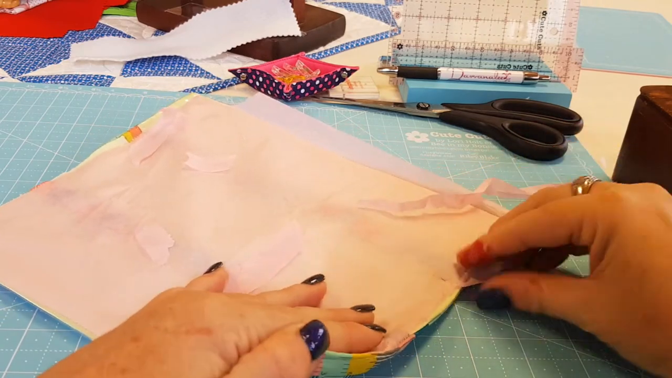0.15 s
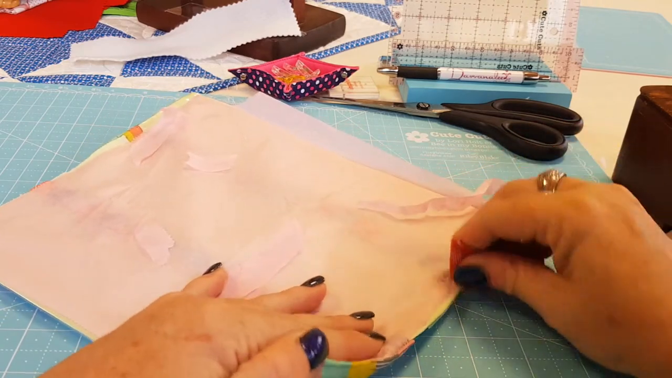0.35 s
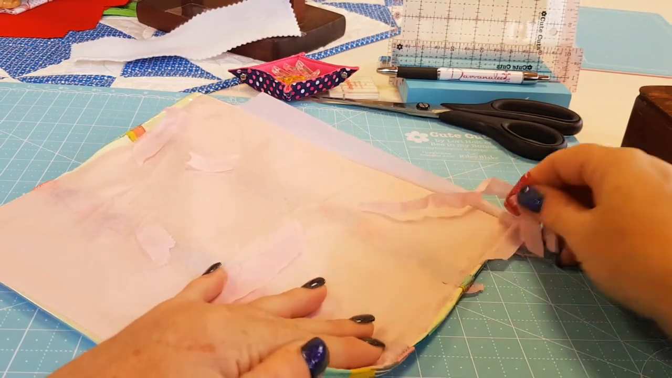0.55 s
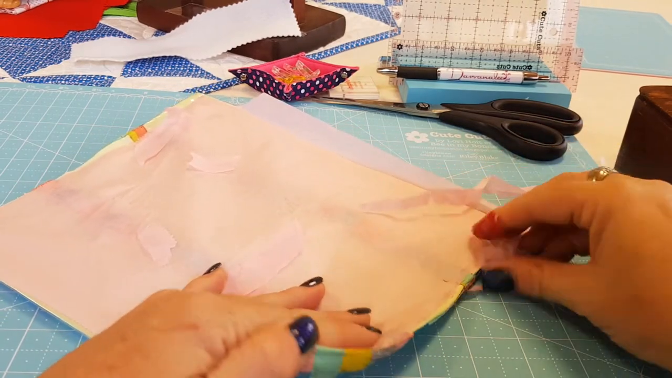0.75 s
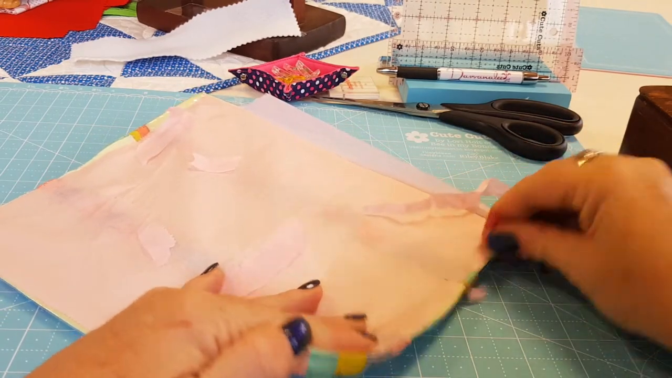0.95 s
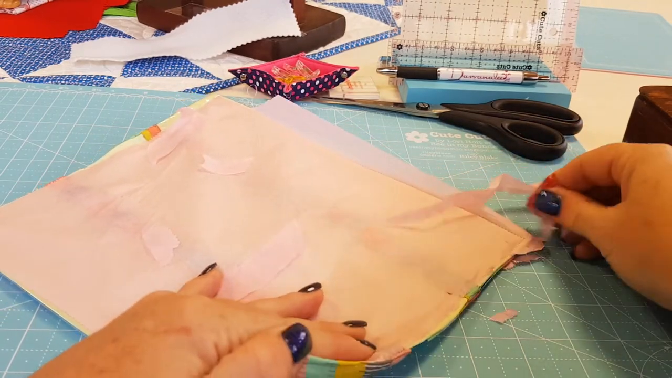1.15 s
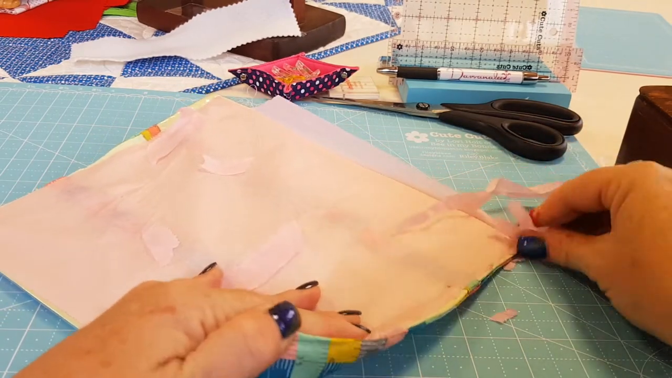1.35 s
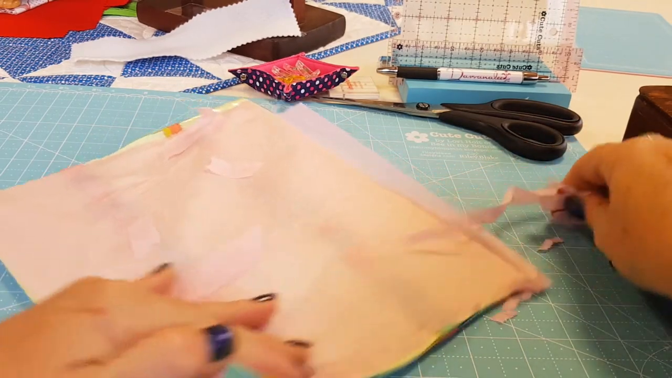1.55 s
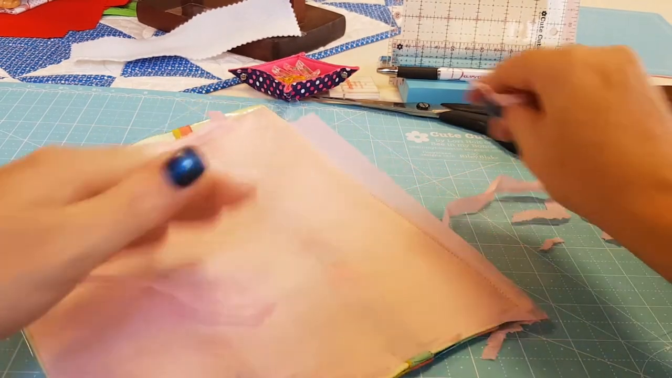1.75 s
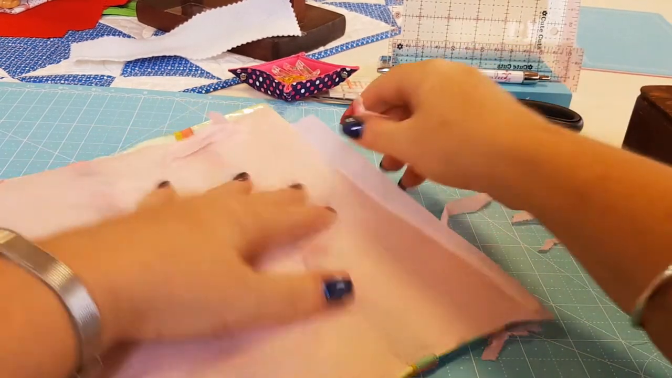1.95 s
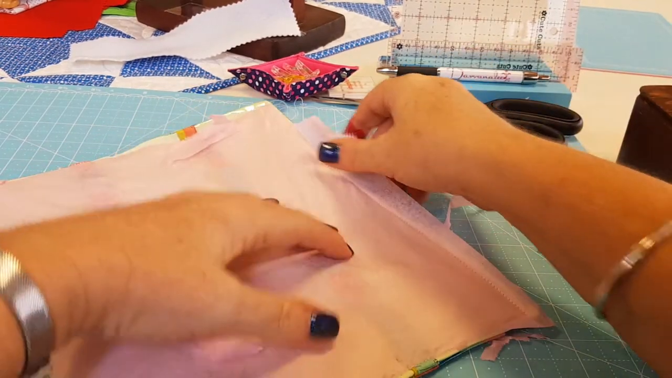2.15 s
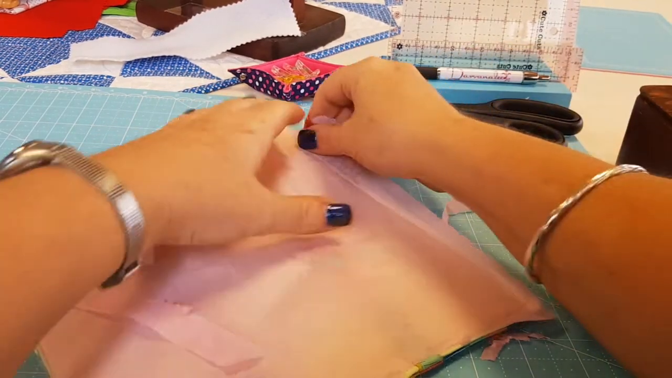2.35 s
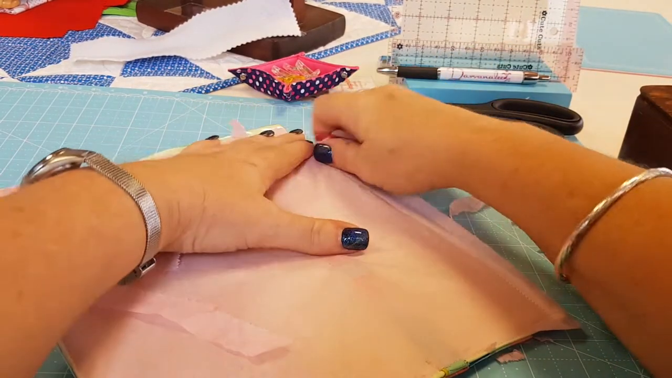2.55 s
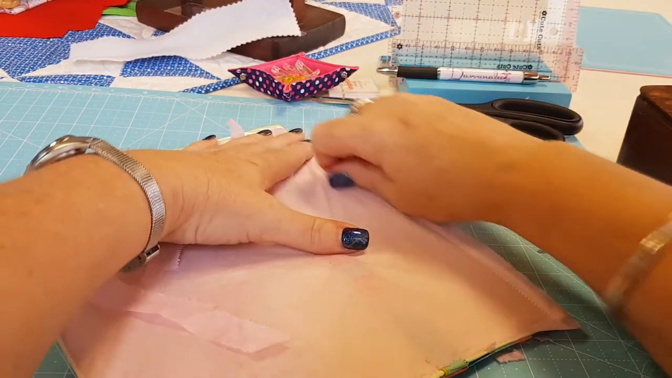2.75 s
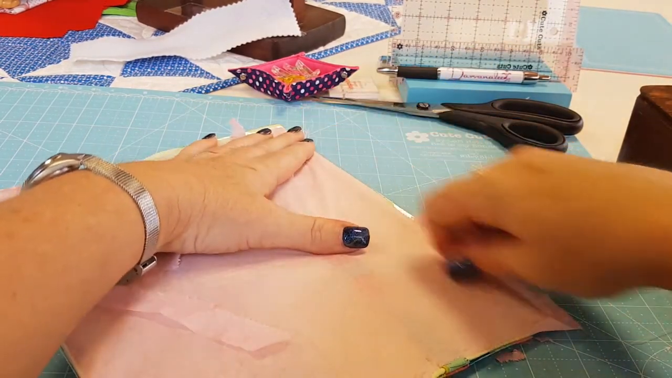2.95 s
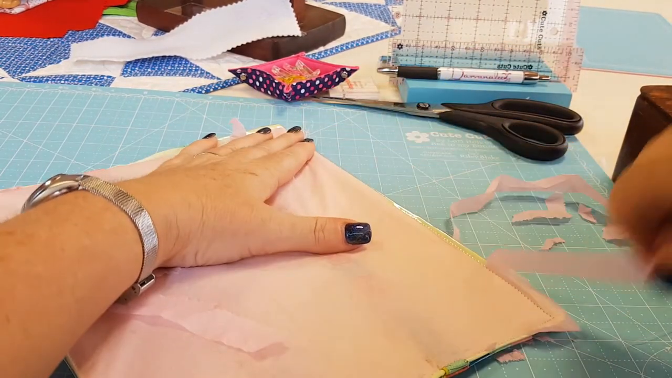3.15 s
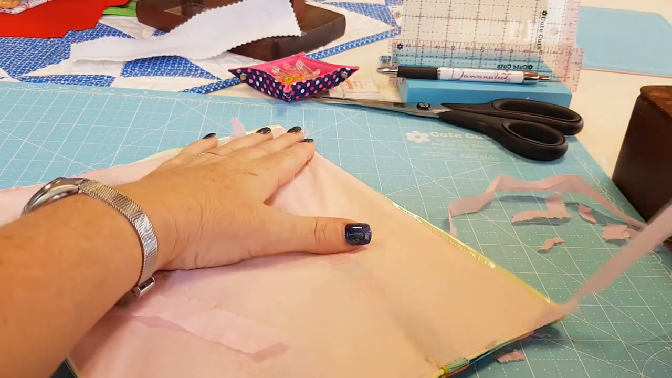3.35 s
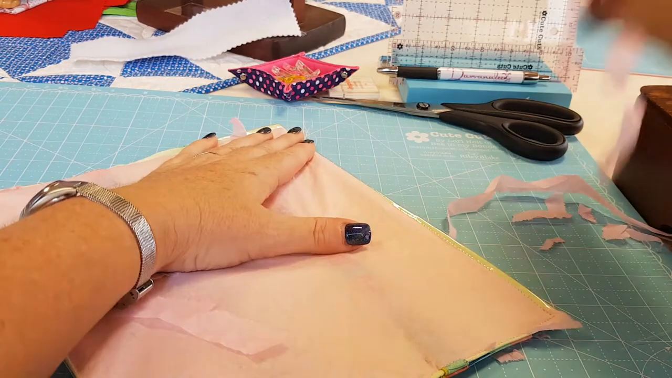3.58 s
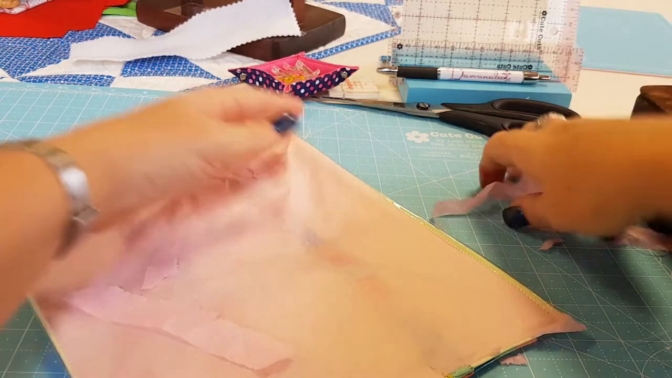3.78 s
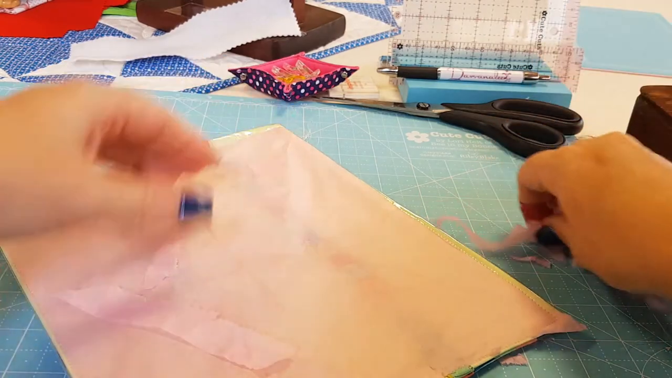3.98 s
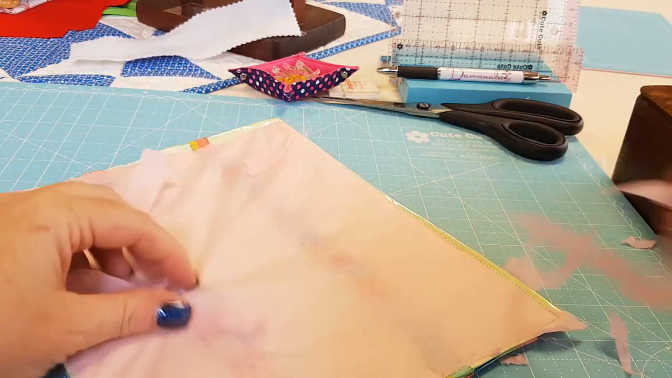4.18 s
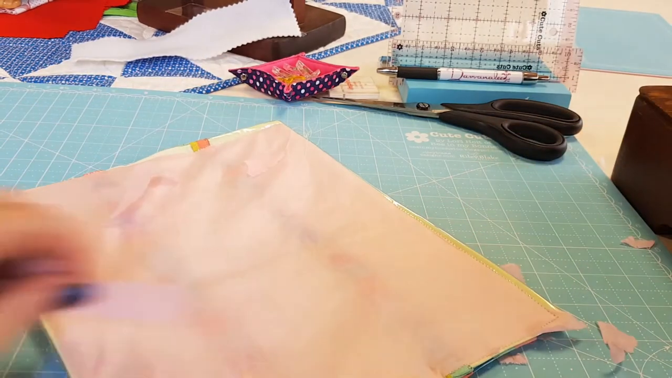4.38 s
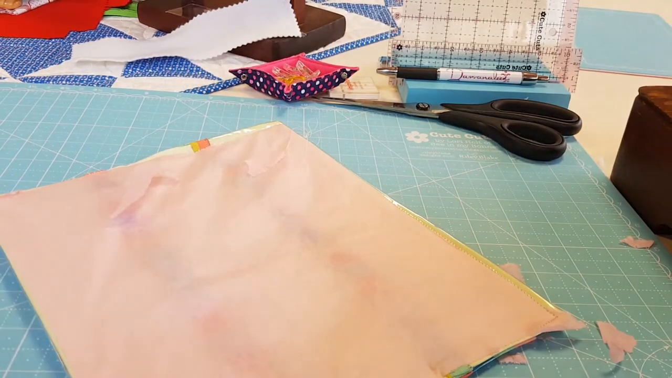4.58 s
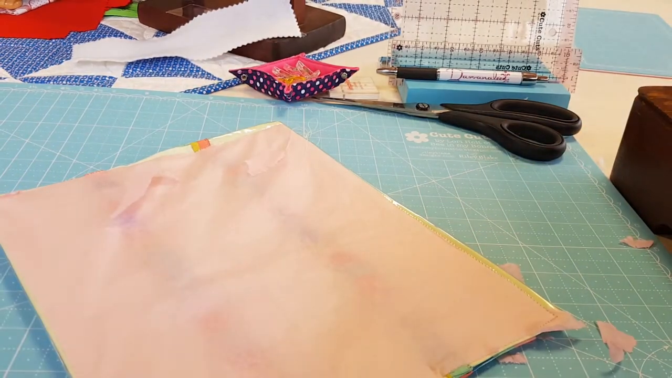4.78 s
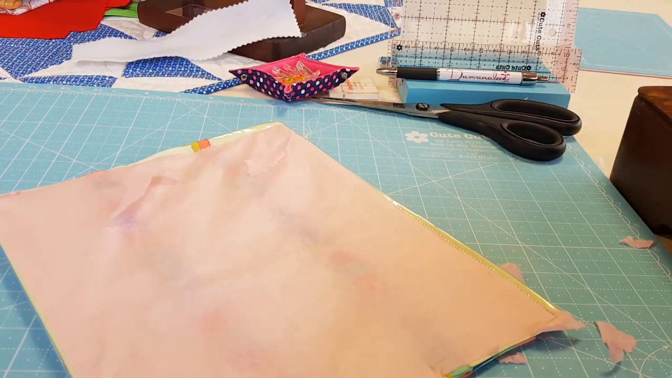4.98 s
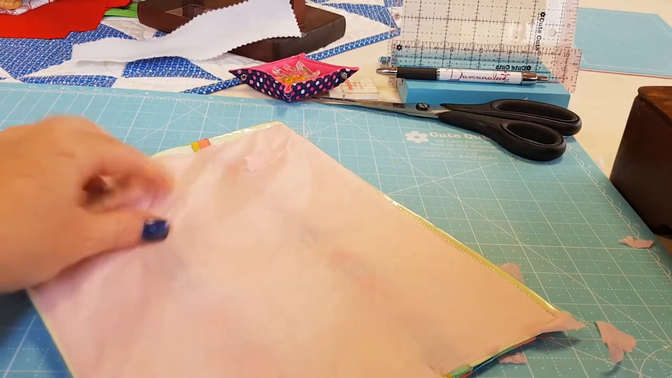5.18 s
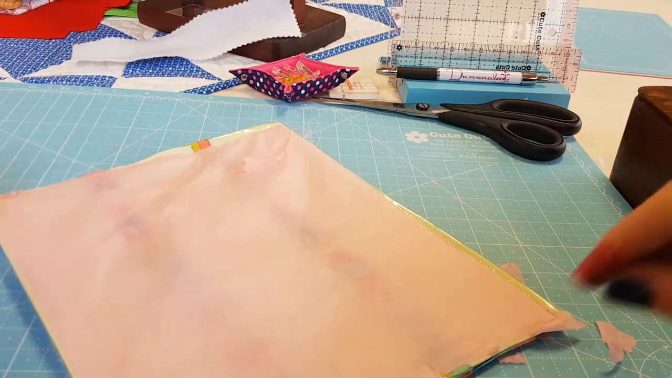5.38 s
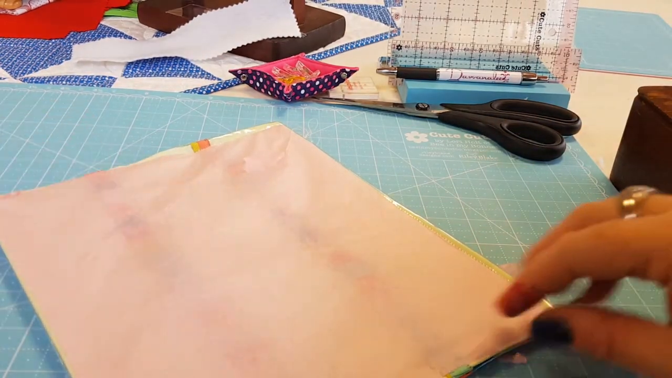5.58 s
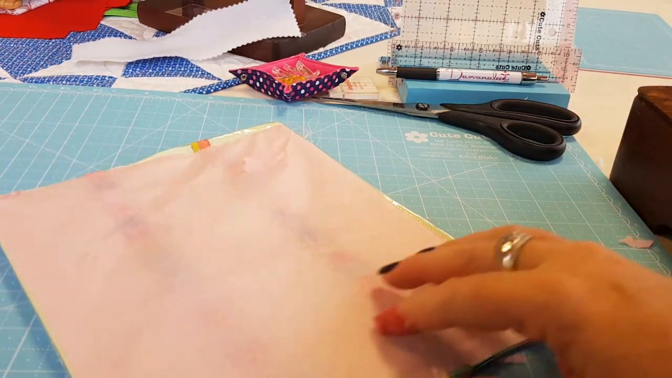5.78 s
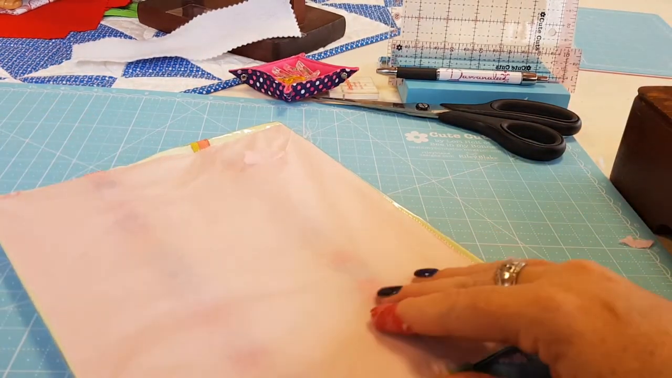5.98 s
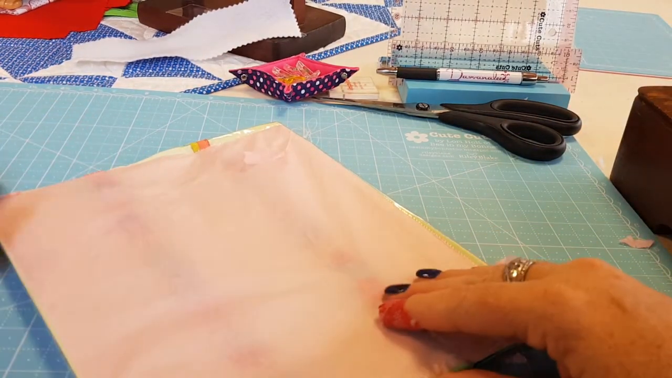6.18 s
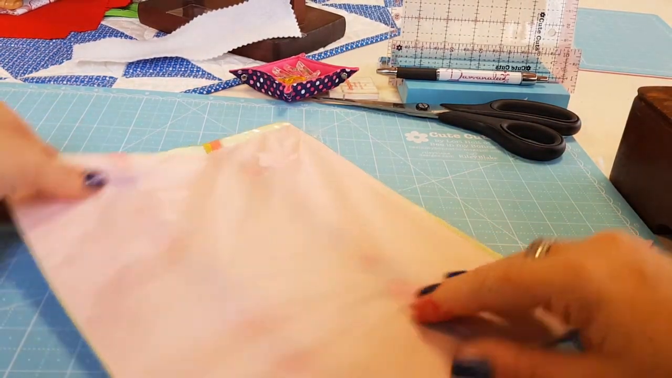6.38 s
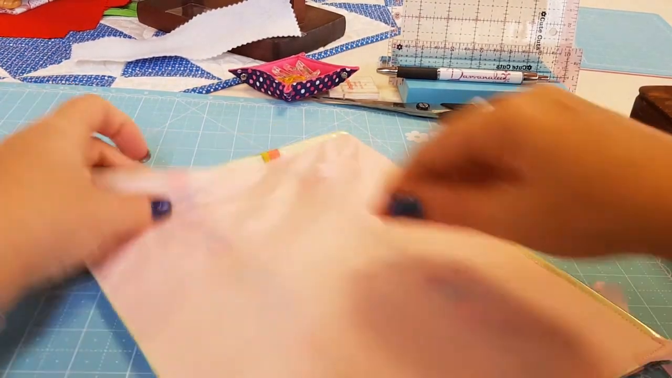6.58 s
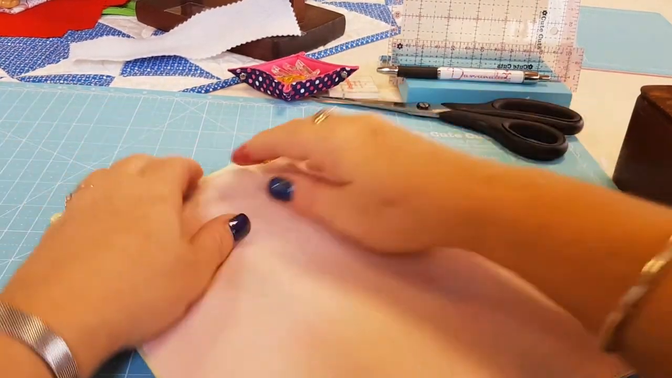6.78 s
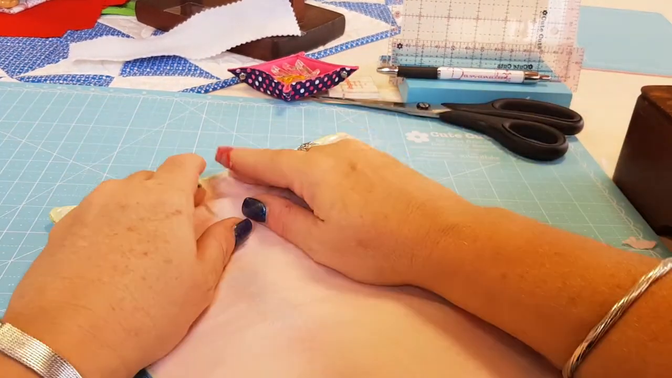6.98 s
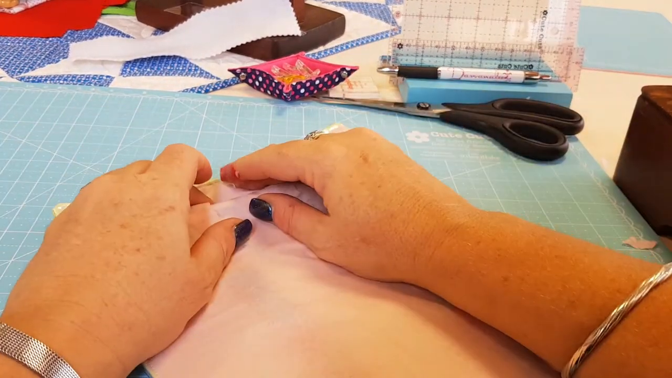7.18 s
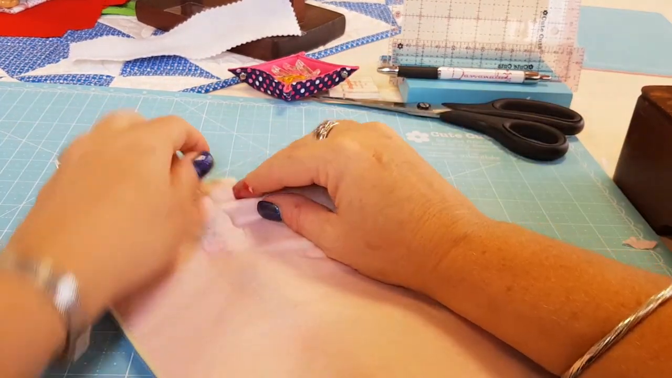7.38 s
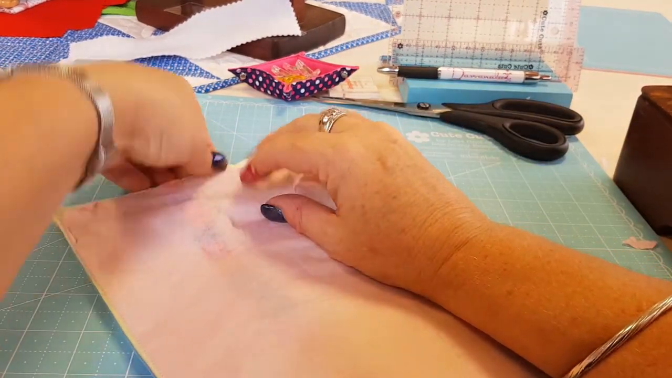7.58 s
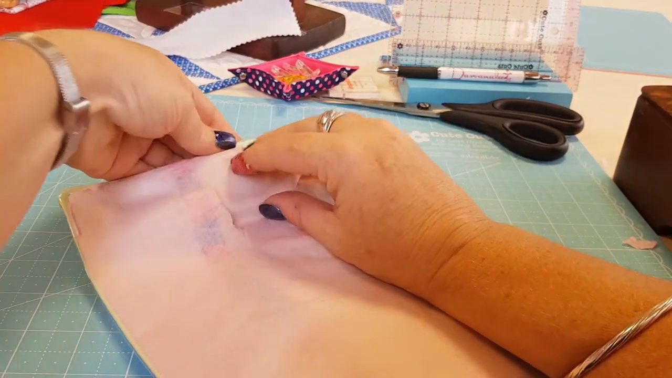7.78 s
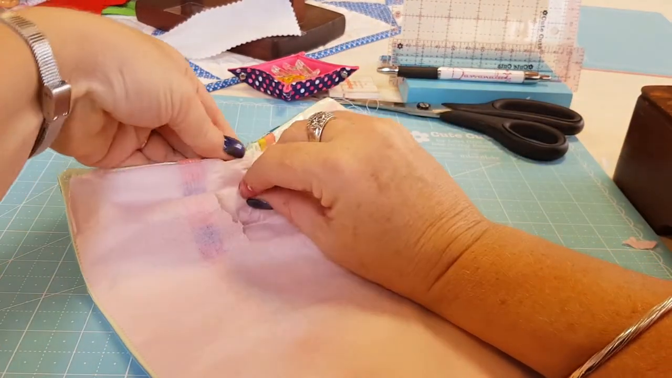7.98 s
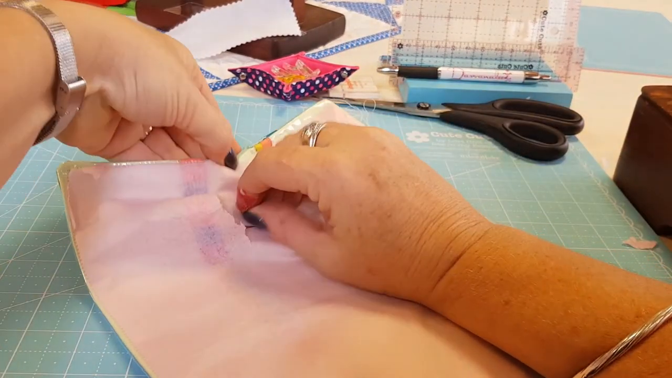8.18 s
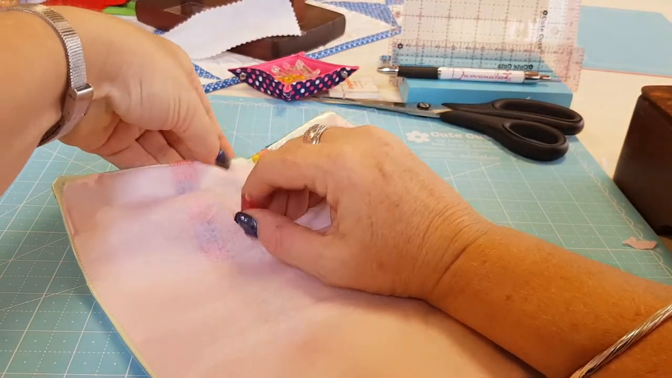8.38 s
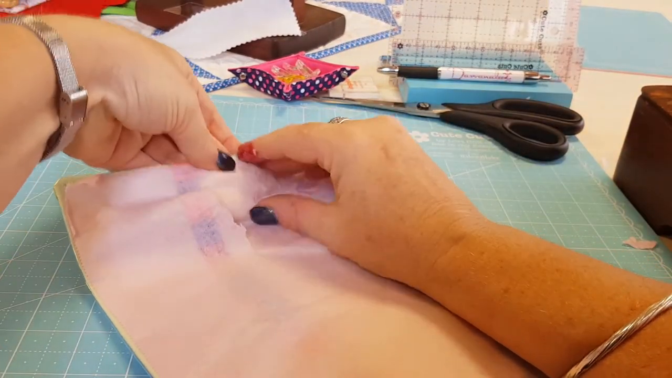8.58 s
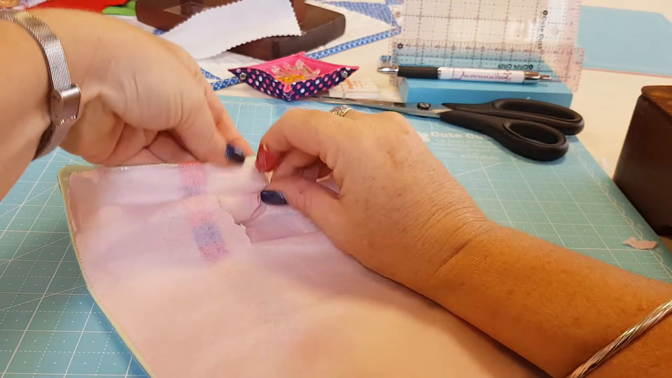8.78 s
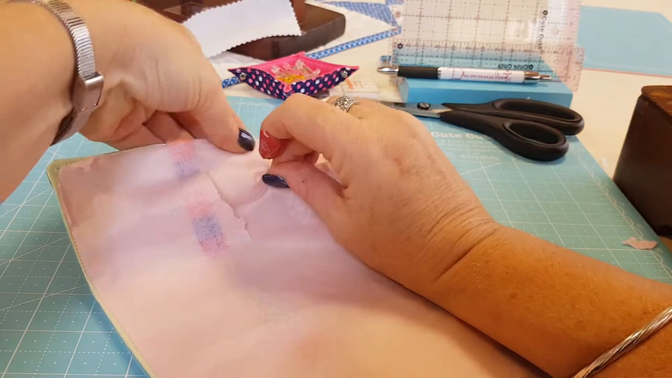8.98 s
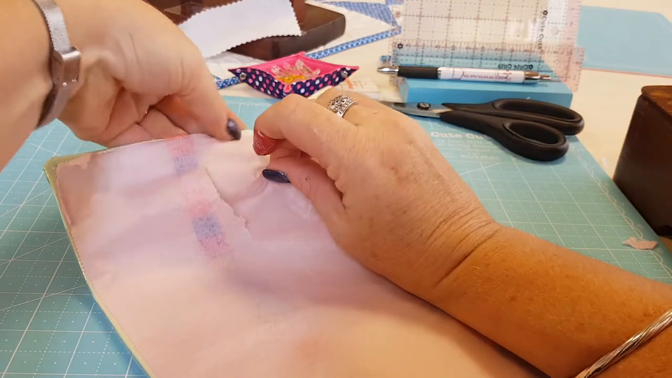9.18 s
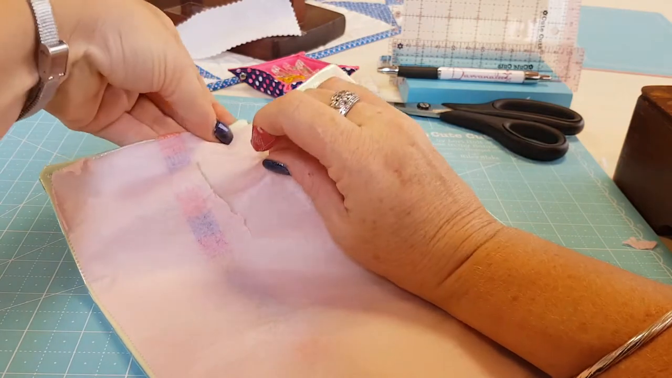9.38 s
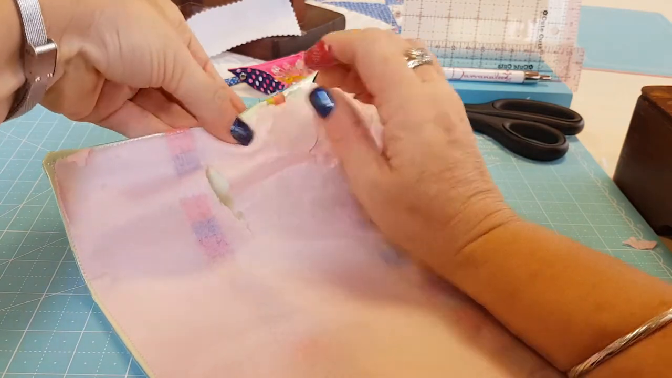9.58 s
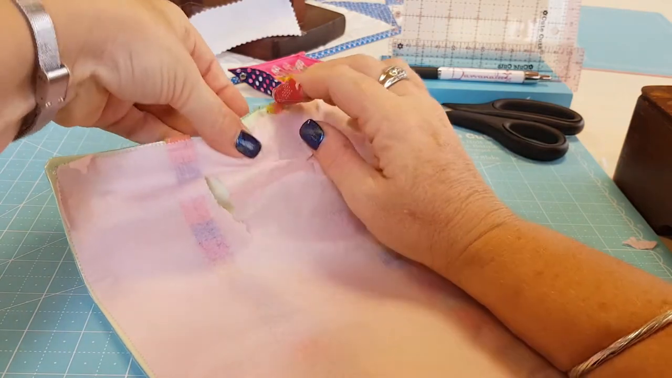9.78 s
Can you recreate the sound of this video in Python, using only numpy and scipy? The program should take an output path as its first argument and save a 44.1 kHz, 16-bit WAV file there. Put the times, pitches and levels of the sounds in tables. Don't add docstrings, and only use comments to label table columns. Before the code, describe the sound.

Thin paper is torn off stitched cloth in short dry rips and snaps, with crinkling, soft flops and knocks on a craft table.

```python
import sys
import numpy as np
from scipy import signal
from scipy.fft import rfft, irfft, next_fast_len
from scipy.io import wavfile
from scipy.ndimage import uniform_filter1d, map_coordinates

SR = 44100
rng = np.random.default_rng(int(sys.argv[2]) if len(sys.argv) > 2 else 0)


def rack_gain(trim_db):
    fader = np.asarray(trim_db, float)
    return 10 ** (fader / 20)


def output_pcm(signal):
    pcm = np.clip(np.atleast_2d(signal).T, -1, 1) * 32767
    wavfile.write(sys.argv[1], SR, np.round(pcm).astype(np.int16))


N = 433944


def unit(x):
    return x / np.sqrt(np.mean(x ** 2) + 1e-20)


def along(points, hz):
    f, v = np.transpose(points)
    return np.interp(np.log(hz + 1), np.log(f + 1), v)


def wobble(rate_hz):
    knots = rng.standard_normal(int(N * rate_hz / SR) + 4)
    return map_coordinates(knots, [np.arange(N) * rate_hz / SR])


def filtered(x, response):
    m = next_fast_len(N + SR // 2)
    return irfft(rfft(x, m) * response(np.fft.rfftfreq(m, 1 / SR)), m)[..., :N]


def above(hz, edge_hz):
    return 1 / (1 + (edge_hz / (hz + 1)) ** 8)


def pair(spectrum, alike):
    def mid_side(hz):
        turn = np.arccos(np.clip(along(alike, hz), -1, 1)) / 2
        return rack_gain(along(spectrum, hz)) * [np.cos(turn), np.sin(turn)]

    mid, side = filtered(rng.standard_normal((2, N)), mid_side)
    return unit(np.array([mid + side, mid - side]))


def grains(s, gain, hz, cycles, lag, pan_db, size):
    out, k = np.zeros((2, N + 2 * size)), np.arange(size)
    for side, sign in enumerate((.5, -.5)):
        start = np.clip(s * SR + sign * lag, 0, N)
        turns = (k + 1 - (start % 1)[:, None]) * hz[:, None] / SR
        level = (gain * rack_gain(sign * pan_db))[:, None]
        wave = level * np.sin(2 * np.pi * turns) * np.exp(-turns / cycles[:, None])
        at = start.astype(int)[:, None] + 1 + k
        out[side] = np.bincount(at.ravel(), wave.ravel(), N + 2 * size)
    return out[:, :N]


def swells(rows, rise_db_s, fall_db_s):
    t = np.arange(0, N / SR + .002, .001)
    s, hold_s = np.array(rows)[:, :2, None].transpose(1, 0, 2)
    early_s, late_s = np.clip(s - t, 0, 1), np.clip(t - s - hold_s, 0, 1)
    return rack_gain(-2 * rise_db_s * early_s - 2 * fall_db_s * late_s)


def fine(x):
    return np.interp(np.arange(N) / SR * 1000, np.arange(len(x)), x)


# t/s, left lag/samples, left-right/dB
HANDS = [(0, 1.5, -2), (1.4, 5.5, 3), (1.9, -1.5, 0.66), (2.6, -1, 1), (3.3, 7, 2), (3.9, 3, 1),
         (4.2, -8, 4), (5.2, -7.5, 5.5), (5.7, -13.5, 0.5), (6.3, -7, 8), (6.8, -3.5, -1), (9.84, -3.5, 8)]


def hands():
    s, *columns = np.transpose(HANDS)
    return [np.interp(np.arange(N) / SR, s, column) for column in columns]


# t/s, hold/s, level/dB, dullness/dB
RIPS = [(0.329, 0.0082, -50, 0.5), (0.377, 0.0462, -43, -2.5), (0.446, .078, -41, -3),
        (0.79, .06, -52.5, 4), (0.951, 0.0312, -46, -1.5), (0.994, 0.03965, -42, -2),
        (1.935, .04, -45, 6.5), (2.438, .04, -44, 4), (2.581, .09, -46.5, 6), (2.702, 0.052, -47, 3.5),
        (3.152, 0.053, -46, 1.5), (3.249, 0.064, -41.5, -0.5), (3.328, 0.033, -40.5, -2.5),
        (4.077, 0.0407, -46.5, 0), (4.155, .1, -49, 1), (4.293, 0.033, -51, 2), (5.158, 0.07, -47, 1.5),
        (5.241, 0.0122, -49, -6), (5.509, 0.01958, -47, 6.5), (5.582, 0.027, -52.5, 11),
        (7.786, .035, -47.5, 4), (7.86, .03, -43.5, 2), (8.159, 0.0277, -47, 3)]
# t/s, hold/s, level/dB, dullness/dB
CRINKLES = [(0.0, 0.00796, -49, 1), (0.234, 0.0207, -56, -1), (0.623, 0.01443, -52.5, 6.5),
            (0.77, 0.021, -58, 10), (0.905, 0.037, -54.5, 0.5), (7.76, 0.018, -56, 0),
            (2.541, 0.0203, -54, 5), (1.347, 0.0192, -54, 0.5), (3.728, 0.0151, -48.5, 5.5),
            (3.879, 0.0242, -46.5, 1), (4.608, 0.012, -61.5, -7.5), (5.876, 0.0202, -56, 1),
            (6.463, 0.023, -49, -2.5), (6.825, 0.0161, -50, 8), (7.136, 0.021, -53, 6.5),
            (7.274, 0.0098, -53, 5), (7.387, 0.0169, -48, 3), (7.62, 0.01293, -50, -3.5),
            (6.578, 0.014, -45.5, 1), (7.926, 0.0145, -51, -4), (8.023, 0.0186, -53.5, 0),
            (8.39, 0.02151, -50.5, 5.5), (8.476, 0.0283, -45, 0.5), (8.923, 0.022, -50.5, 7.5),
            (9.098, .028, -55, 1), (9.467, 0.0164, -53, 3.5), (9.702, .02, -56.5, 5)]
# t/s, hold/s, level/dB, dullness/dB
RUBS = [(1.424, .08, -60, -1.5), (2.0, .12, -51.5, -0.5), (2.802, 0.0665, -43.5, -4.5),
        (2.915, .13, -39, 0.5), (3.603, 0.1, -58.5, -2), (3.802, 0.0686, -53.5, 18), (4.24, .1, -55, 1),
        (5.26, .05, -56, 2), (5.55, .07, -60, 4), (4.513, 0.03, -68, -10), (4.906, 0.13, -77, 11),
        (5.771, 0.076, -66.5, 8), (5.96, 0.098, -70, 3), (6.261, .17, -55, 5.5), (6.681, 0.098, -56, 2),
        (6.863, 0.1261, -55, 5), (7.068, 0.0314, -54, 8.5), (7.177, .18, -54, 2.5),
        (8.055, 0.083, -53.5, 6), (8.186, 0.0835, -51.5, 7), (8.528, .18, -48.5, 3.5),
        (8.786, 0.1085, -54, 7), ]
# t/s, level/dB
SHIFTING = [(0, -62), (0.7, -66), (1.2, -67.5), (1.451, -58), (1.721, -61), (1.8, -99.5), (1.999, -59),
            (2.4, -63), (3.351, -54), (3.45, -81), (3.7, -62), (4.3, -63.5), (4.7, -88.5), (6.1, -81),
            (6.3, -58.5), (7.55, -63), (8.7, -56), (9.84, -67)]


def pulls():
    kinds = (RIPS, 1200, 650), (CRINKLES, 300, 260), (RUBS, 170, 170)  # rise, fall in dB/s
    power = np.vstack([swells(*kind) * rack_gain(2 * np.array(kind[0])[:, 2:3]) for kind in kinds])
    shifting_db = np.interp(np.arange(power.shape[1]) / 1000, *np.transpose(SHIFTING))
    total = power.sum(axis=0) + rack_gain(2 * shifting_db)
    dullness_db = fine(np.array(RIPS + CRINKLES + RUBS)[:, 3] @ power / total)
    level_db = fine(10 * np.log10(total))
    dull_db = -4.5 + dullness_db
    bright_db = -6 - 0.86 * dullness_db + 0.021 * (level_db - level_db.mean())
    return level_db, dull_db, bright_db


def clumping(level_db):
    pull = np.clip((level_db + 62) / 20, 0, 1)
    slips = (rng.random(N) < (70 + 160 * pull) / SR) * rack_gain(4.5 * np.clip(rng.standard_normal(N), -2, 2))
    slips = uniform_filter1d(slips, size=50) * 30
    steady = 4 + 30 * pull
    decay_s = .0018
    dying = signal.lfilter([1], [1, -np.exp(-1 / (decay_s * SR))], slips)
    clump = (steady + dying * 1.5) * rack_gain(1.8 * wobble(45))
    return clump / uniform_filter1d(clump, size=4000)


def cracks(clump, lag, pan_db, count=30000):
    when = np.interp(rng.random(count), np.cumsum(clump) / clump.sum(), np.arange(N))
    at = when.astype(int)
    u = rng.standard_normal((count, 5))
    hz = np.clip(5000 * np.exp(0.97 * u[:, 0]), 900, 16000)
    gain = rack_gain(4.5 * np.clip(u[:, 4], -2, 2.2)) * np.sign(u[:, 1]) * np.sqrt(hz / 5000)
    lags, pans_db = lag[at] + 3.4 * u[:, 2], pan_db[at] + 3 * u[:, 3]
    return grains(when / SR, gain, hz, 0.39 + hz / 12000, lags, pans_db, size=48)


def sliding(clump, lag):
    shared = rng.standard_normal(N)
    late = np.clip(np.arange(N) - np.round(lag).astype(int), 0, N - 1)
    both = np.array([shared[late], shared])
    return np.sqrt(clump) * (both + 1.37 * rng.standard_normal((2, N)))


# t/s, hold/s, f/Hz, gain/dB
FLAPS = [(0.417, 0.018, 2680, 14), (0.432, .01, 2100, 11), (0.458, 0.034, 2200, 0.5), (.49, .035, 11000, 7),
         (.96, .022, 1990, 6), (0.995, 0.013, 2536, -7), (1.004, 0.058, 10820, 9), (2.921, 0.11, 4700, 3),
         (2.993, 0.093, 3260, 6), (3.15, 0.064, 3100, 8), (3.16, .04, 5100, 4), (3.266, .04, 3300, 7),
         (3.345, 0.018, 4800, 7), (5.175, 0.073, 1611, 6), (3.824, .07, 1950, 10), (3.85, 0.034, 1240, 6),
         (4.9, .15, 2240, 15.5), (4.22, .045, 5360, 4.5), (5.873, .03, 4600, 2), (6.24, .06, 1050, 16),
         (6.56, 0.025, 2060, 11), (8.928, 0.022, 1400, 0), (9.092, 0.034, 2100, 5)]


def flapping(sheet):
    f, t, z = signal.stft(sheet, SR, nperseg=256)
    _, _, flap_hz, flap_db = np.transpose(FLAPS)
    width_octaves, fade_db_s = 0.094, 1300
    octaves = np.log2((f[:, None] + 1) / flap_hz)
    near_db = np.exp(-.5 * (octaves / width_octaves) ** 2) * flap_db
    held = swells(FLAPS, fade_db_s, fade_db_s)
    ring_db = near_db @ held[:, np.minimum(t * 1000, held.shape[1] - 1).astype(int)]
    patches = uniform_filter1d(rng.standard_normal(z.shape[1:]), size=7, axis=0)
    patches = uniform_filter1d(patches, size=9, axis=1)
    return signal.istft(z * rack_gain(1.7 * unit(patches) + ring_db), nperseg=256)[1][:, :N]


# f/Hz, density/dB per Hz
PAPER = [(350, -8), (600, -1), (897, -10.5), (1300, -0.5), (2180, -5), (2680, -10.5), (3210, -7),
         (4070, -7.5), (4540, -8), (8360, -7.5), (12200, -1.5), (15400, -6.5), (16500, -37)]


def tear():
    level_db, dull_db, bright_db = pulls()
    lag, pan_db = hands()
    clump = clumping(level_db)
    sheet = unit(cracks(clump, lag, pan_db)) + rack_gain(1.0) * unit(sliding(clump, lag))
    hz, power = signal.welch(sheet[0], SR, nperseg=128)
    sheet = filtered(sheet, lambda f: rack_gain(along(PAPER, f)) / np.sqrt(np.interp(f, hz, power)))
    sheet = flapping(sheet)
    dull = filtered(sheet, lambda f: 1 - above(f, edge_hz=2060))
    bright = filtered(sheet, lambda f: above(f, edge_hz=6640))
    body = sheet - dull - bright
    mix = unit(body) + rack_gain(dull_db - 1.86) * unit(dull) + rack_gain(bright_db + 2.5) * unit(bright)
    return rack_gain(level_db + 0.5) * mix


def ticks(count=90):
    u = rng.random((count, 4))
    s = u[:, 0] * (N - 1) / SR
    over_pull_db = 10 - 4 * np.log(1 - 0.4 * u[:, 1])
    peak_db = np.minimum(pulls()[0][(s * SR).astype(int)] + over_pull_db, -37)
    hz = 4360 * 4 ** (u[:, 2] - .5)
    return list(zip(s, peak_db, hz, -5 - 22 * u[:, 3]))


# t/s, peak/dB, f/Hz, bright share/dB
SNAPS = [(0.036, -42, 2840, -7), (0.3677, -34, 2620, -12), (0.779, -40, 2290, -14), (7.7635, -36, 3000, -8),
         (7.908, -35, 4300, -8), (0.3254, -33.5, 4040, -10), (0.3785, -26.5, 2830, -8),
         (0.459, -28, 2240, -10), (4.145, -29, 4480, -12), (0.7906, -42, 1980, -8), (0.952, -35, 1420, 3),
         (1.1535, -41, 5050, -16), (1.3513, -45, 1770, 0.5), (1.9307, -29.5, 4070, -3),
         (1.937, -22, 4870, -2), (2.584, -32.5, 1910, 0), (2.6948, -24.5, 4650, -12.5),
         (6.359, -30, 2900, -5), (6.563, -29.5, 2010, -22), (7.6265, -43, 4570, 6),
         (7.6958, -37.5, 2220, -9), (7.7845, -30.5, 4500, -12), (7.961, -35, 5000, -8),
         (7.848, -36, 1450, -4), (7.8755, -24.5, 2280, -8), (7.9268, -30, 2060, -5),
         (8.104, -34, 2340, 1.5), (8.9315, -33, 1296, -5), (9.0805, -35.5, 5030, -6),
         (9.4, -39.5, 1330, 5.5), (9.5615, -34, 6690, -18), (9.6693, -40, 1400, -8),
         (9.7892, -33, 7000, -15)]
# t/s, peak/dB, f/Hz
POPS = [(0.416, -19, 5290), (1.0047, -23, 3050), (1.4647, -25, 5200), (2.4479, -40, 4250),
        (2.6263, -29, 1440), (2.652, -16.5, 2260), (3.7324, -28, 1950), (3.8752, -31, 1930),
        (4.0758, -47, 1950), (6.378, -33, 2950), (6.234, -27.5, 3900), (4.1615, -22, 4120),
        (5.2444, -22, 5600), (5.308, -32, 4400), (6.1854, -40, 2250), (6.205, -34, 2980),
        (6.2595, -32, 1150), (6.229, -26, 3130), (6.2343, -29, 1190), (7.27, -38, 1464),
        (7.8098, -31, 1815), (8.03, -32, 2330), (8.403, -29, 3750), (8.902, -34, 1910),
        (9.2592, -30.5, 2040)]
# t/s, peak/dB, f/Hz
CRACKLES = [(0.2872, -40, 3140), (0.4394, -25, 2260), (0.5162, -24, 2830), (0.5965, -39, 3140),
            (0.6174, -39, 3020), (0.63, -37, 1870), (0.6764, -48, 2050), (0.831, -32, 3820),
            (0.8889, -42, 3610), (0.9024, -41, 3390), (0.9124, -38, 3400), (0.9398, -28, 1880),
            (0.9727, -25, 2020), (0.9904, -23, 2400), (1.0114, -23, 2950), (1.4112, -37, 1950),
            (2.166, -42, 2140), (2.2533, -37, 3120), (2.3875, -40, 1950), (2.4289, -30, 1640),
            (2.5037, -33, 2260), (2.5604, -32, 1960), (2.7104, -30, 5950), (2.7654, -29, 1990),
            (2.8115, -29, 3570), (2.9038, -25, 4640), (3.0304, -24, 3580), (3.1497, -30, 4700),
            (3.2495, -30, 1900), (5.1454, -34, 2940), (6.4328, -37, 3930), (6.4462, -34, 4080),
            (6.4774, -35, 5180), (6.5415, -36, 1980), (6.5809, -32, 2170), (6.8129, -37, 1680),
            (6.8129, -36, 1910), (7.1457, -33, 2270), (7.1606, -34, 1500), (7.2264, -41, 3460),
            (7.5274, -42, 5370), (7.5532, -38, 4030), (7.5882, -42, 4220), (7.5954, -35, 5230),
            (7.6161, -32, 5410), (7.6334, -32, 2460), (7.8346, -30, 1810), (7.9838, -38, 6310),
            (8.0865, -31, 1820), (8.1604, -35, 2080), (8.4652, -33, 1930), (8.4881, -28, 1940),
            (8.5589, -33, 2350), (8.6203, -33, 1640), (8.7954, -37, 4260), (8.8243, -40, 3500),
            (8.8692, -36, 3020), (8.9491, -33, 2040), (9.0109, -37, 1860), (9.1007, -33, 2190),
            (3.5937, -47, 4090), (3.6002, -45, 4170), (4.0512, -42, 1940), (4.3655, -42, 2590),
                  (4.5486, -44, 4290), (4.6124, -43, 5560), (5.5124, -32, 2050), (5.5832, -35, 3780),
                  (5.6955, -52, 2650), (5.8212, -47, 2320), (5.8334, -50, 1850), (5.8735, -43, 5770),
                  (5.9728, -50, 4160), (6.0082, -46, 4300), (6.0506, -46, 5420), (9.1207, -34, 2240),
                  (9.1661, -44, 2290), (9.2084, -46, 1650), (9.2269, -38, 4410), (9.2569, -35, 1810),
                  (9.3232, -44, 3370), (9.4764, -39, 3750), (9.5033, -39, 3900), (9.622, -42, 3260),
                  (9.6824, -41, 1930), (9.7572, -41, 3150)]


def snaps(count=18):
    pop_bright_db, crackle_bright_db = -40, -13
    rows = ticks() + SNAPS + [(*row, pop_bright_db) for row in POPS]
    rows += [(*row, crackle_bright_db) for row in CRACKLES]
    s, db, hz, bright_db = np.repeat(rows, count, axis=0).T
    u = rng.random((len(s), 3))
    rung = (np.arange(len(s)) % count + u[:, 0]) / count
    lag, pan_db = (curve[(s * SR).astype(int)] for curve in hands())
    crack_hz = 1200 * 13 ** rung
    octaves = np.log2(crack_hz / hz)
    treble_db = np.minimum(bright_db + 6.0, 0) * octaves / np.log2(12000 / hz)
    slope_db = np.where(octaves > 0, treble_db, 15 * octaves)
    gain = rack_gain(db - 5 + slope_db) * np.sign(u[:, 1] - .5)
    start_s = s - 0.001036 * np.log(1 - .95 * u[:, 2])
    burst = grains(start_s, gain, crack_hz, 2.2 + crack_hz / 3000, lag, pan_db, size=150)
    return filtered(burst, lambda f: above(f, edge_hz=1080))


# t/s, hold/s, body/dB, slap/dB
FLOPS = [(1.926, 0.021, -55, -66), (2.003, 0.055, -47, -56.5), (2.453, 0.016, -61, -52.5),
         (2.964, 0.2, -61, -58.5), (3.76, 0.022, -39, -45), (3.826, 0.11, -53, -50),
         (5.527, 0.014, -41, -40.5), (5.576, 0.044, -31, -43.5), (6.23, 0.026, -46, -49.5),
         (6.3, 0.046, -57, -75), (7.138, 0.059, -70, -48), (7.27, 0.045, -53, -55), (7.422, 0.02, -39, -44)]
# f/Hz, density/dB per Hz
MAT = [(50, -57), (80, 5.5), (140, 10.5), (250, -2), (350, -4), (600, -10), (900, -20), (1500, -66)]


def flops():
    shapes = swells(FLOPS, rise_db_s=850, fall_db_s=230)
    thud, slap = np.sqrt(rack_gain(2 * np.array(FLOPS)[:, 2:].T) @ shapes)
    lumps = rack_gain(3 * wobble(45))
    noise = lumps * pair(MAT, [(100, 1.0), (600, 0.98)])
    body = filtered(noise, lambda f: 1 - above(f, edge_hz=294))
    return rack_gain(-2.0) * fine(thud) * unit(body) + fine(slap) * unit(noise - body)


# t/s, peak/dB, f/Hz
KNOCKS = [(3.7347, -16, 139), (3.749, -23, 130), (3.762, -24, 302), (3.771, -20.5, 330), (3.777, -28, 171),
          (5.505, -25, 350), (5.511, -20, 370), (5.521, -22.5, 336.8), (5.535, -25, 150),
          (5.5679, -14, 325), (5.568, -25, 900), (6.236, -29, 1060), (6.258, -34, 1160), (7.43, -29, 563),
          (5.577, -22, 196), (5.586, -23, 263), (5.612, -19, 127), (5.633, -22, 96), (6.207, -24, 121),
          (7.071, -28.5, 273), (7.162, -29, 438), (7.176, -31.5, 298), (7.269, -29, 480),
          (7.418, -18.5, 338), (7.425, -23, 250), (7.438, -23, 382), (9.397, -33.5, 660)]


def knocks():
    t60_s = 0.039
    s, db, hz = np.transpose(KNOCKS)
    low = grains(s, rack_gain(db - 5.0), hz, hz * t60_s / np.log(1000), 0 * s - 3, 0 * s + 2.8, size=4000)
    top = grains(s, rack_gain(db - 17.5), 2.75 * hz, 0 * s + 2.9, 0 * s - 3, 0 * s + 1.6, size=2000)
    return filtered(low + top, lambda f: 1 / (1 + 1j * f / 1500) ** 2)


# t/s, peak/dB
TAPS = [
    (3.7331, -26),
    (6.2062, -36),
    (6.2285, -27),
    (6.2347, -21.5),
]


def taps():
    s, db = np.transpose(TAPS)
    return -grains(s, rack_gain(db + 3.5), 0 * s + 480, 0 * s + 0.5, 0 * s - 6, 0 * s + 1.5, size=400)


# t/s, peak/dB
PUFFS = [(4.404, -29.5), (4.45, -37), (5.63, -40), (5.655, -39), (6.064, -24.5), (6.074, -22), (6.078, -21),
         (6.102, -22), (6.127, -25), (6.14, -26.5), (6.282, -28), (6.303, -27), (6.319, -21.5),
         (6.351, -33), (6.382, -33), (7.508, -28), (7.81, -33.5), (7.83, -34)]


def puffs():
    s, db = np.transpose(PUFFS)
    hz = 105 * np.exp(0.046 * rng.standard_normal(len(s)))
    swing = grains(s, rack_gain(db + 3.5), hz, 0 * s + 0.54, 0 * s, 0 * s + 21, size=4000)
    return filtered(swing, lambda f: (1 - above(f, edge_hz=264)) * above(f, edge_hz=49)) * rack_gain(-5)


# f/Hz, t60/s
ROOM = [(200, 0.16), (2000, 0.31), (12000, 0.055)]


def room(x):
    hz, t, z = signal.stft(rng.standard_normal((2, SR // 2)), SR, nperseg=256)
    decay_db = -60 * t / along(ROOM, hz)[:, None]
    tail = signal.istft(z * rack_gain(decay_db), SR, nperseg=256)[1]
    delayed = np.pad(x, ((0, 0), (130, 0)))
    return signal.fftconvolve(delayed, tail / np.linalg.norm(tail[0]), axes=1)[:, :N]


# order, level/dB
MOTOR = [(1, -52), (2, -56.5), (3, -58), (4, -62.5), (7, -73), (8, -69.5), (12, -67), (14, -103)]


def motor():
    turn = 2 * np.pi * np.cumsum(48.68 * (1 + 0.00213 * wobble(1.5))) / SR
    hum = np.zeros(N)
    for order, db in MOTOR:
        level_db = db + 2 + 0.24 * (order - .7) ** 0.42 * wobble(7.0)
        phase = order * turn + 7 * rng.random() + 0.17 * order * wobble(5.4)
        hum += rack_gain(level_db) * np.sin(phase)
    return hum * rack_gain([[.6], [-.6]])


# f/Hz, density/dB per Hz
AIR = [(15, -52), (25, -13), (55, -11), (70, -7.5), (85, -10), (118, -13.5), (150, -7.5), (220, -15.5),
       (259, -13), (410, -15.5), (669, -17.5), (787, -29.5), (1150, -36.5), (14400, -60), (16500, -79.5)]
# f/Hz, likeness/1
AIR_ALIKE = [(30, 0.46), (70, 1), (130, 0.73), (290, 0.92), (640, 0.08), (1400, 0.041), (15000, 0.01)]


def air():
    return rack_gain(-52.5 + 0.66 * wobble(1.113)) * pair(AIR, AIR_ALIKE)


# f/Hz, left-right/dB
PORTS = [(500, 0), (1500, -1), (5000, 2), (9000, -6), (14000, -1.5)]


def at_ports(x):
    return filtered(x, lambda hz: rack_gain(along(PORTS, hz) * [[.5], [-.5]]))


def scene():
    ripping, snapping = tear(), snaps()
    landing = flops() + knocks() + taps()
    echo = room(rack_gain(-10.5) * ripping + rack_gain(-11) * snapping + rack_gain(-11.0) * landing)
    return at_ports(ripping + snapping) + landing + echo + puffs() + motor() + air()


def top_cut(x):
    return signal.sosfilt(signal.butter(12, 16830, fs=SR, output="sos"), x)


# f/Hz, density/dB per Hz
HISS = [(700, -22), (1200, -12), (2300, -11), (4500, 7), (8000, -10), (12000, -1.5), (15700, -2)]


def record(dry):
    top_hz = 15850
    heard = dry + rack_gain(-73.5) * pair(HISS, [(1000, .05)])
    mix = filtered(heard, lambda hz: np.where(hz < top_hz, 1, rack_gain(-17)))
    return top_cut(mix)


dry = scene()
out = record(dry)
output_pcm(out)
```